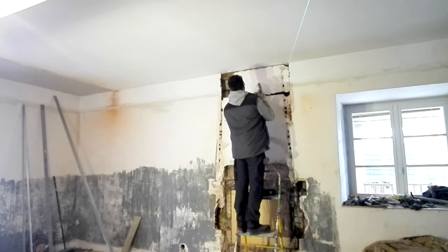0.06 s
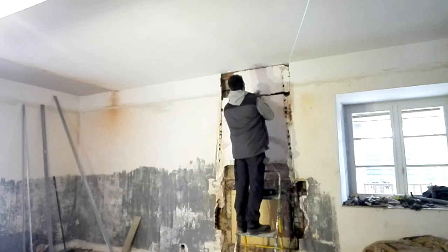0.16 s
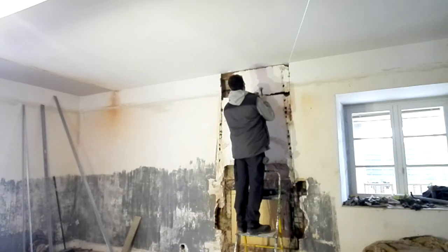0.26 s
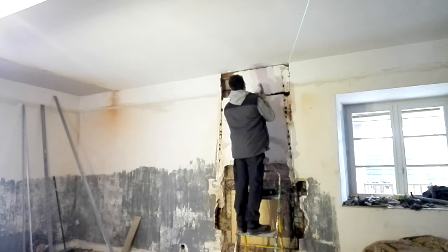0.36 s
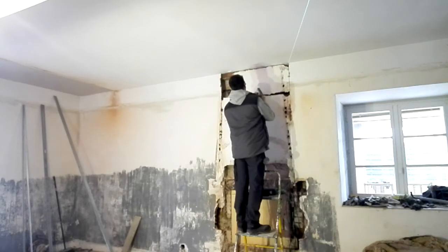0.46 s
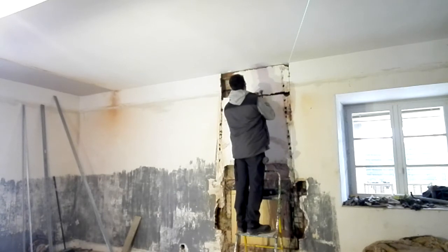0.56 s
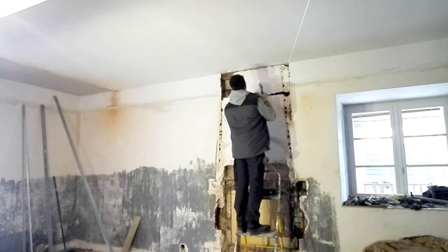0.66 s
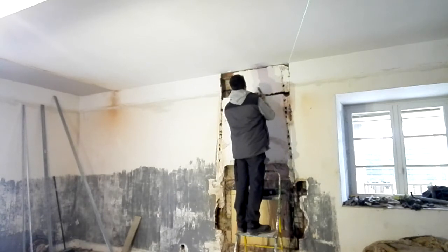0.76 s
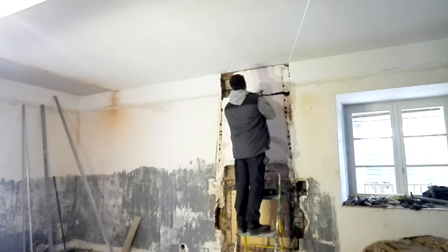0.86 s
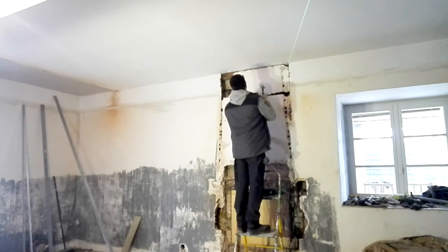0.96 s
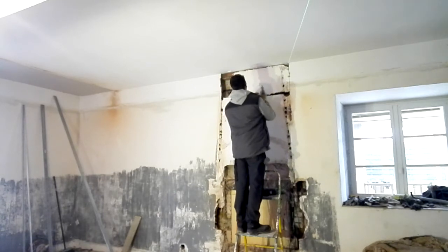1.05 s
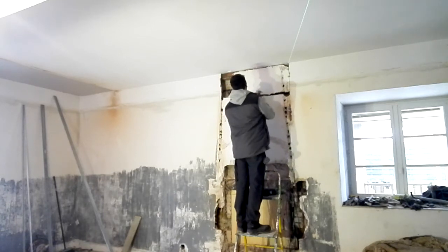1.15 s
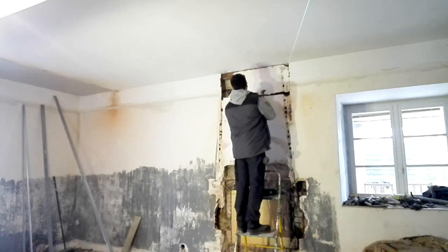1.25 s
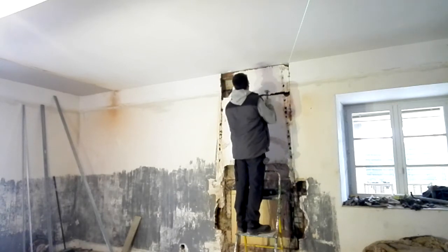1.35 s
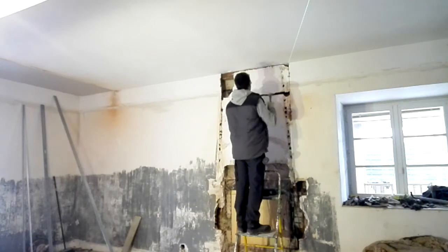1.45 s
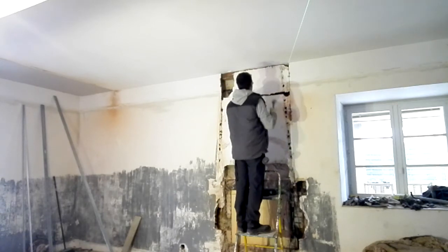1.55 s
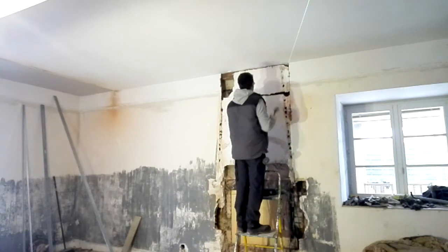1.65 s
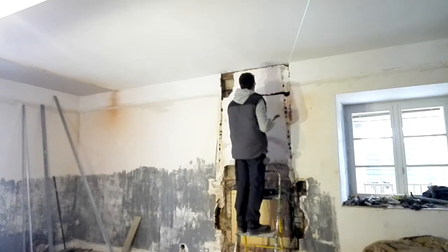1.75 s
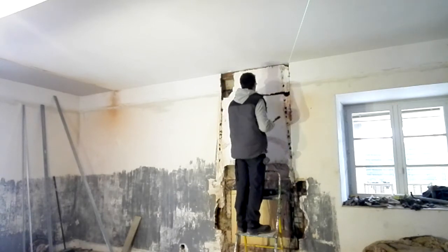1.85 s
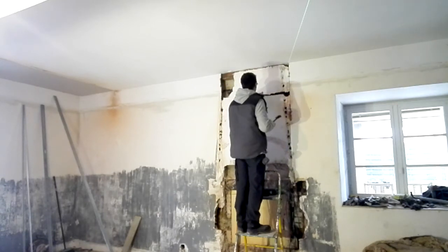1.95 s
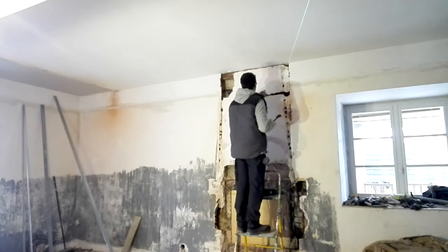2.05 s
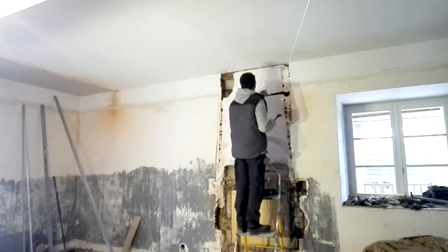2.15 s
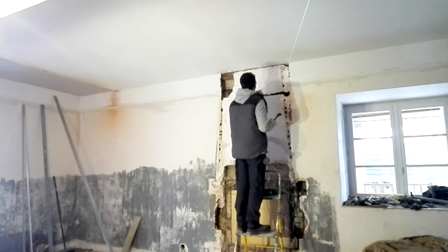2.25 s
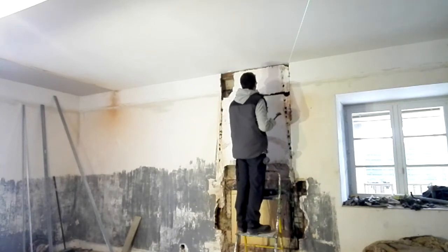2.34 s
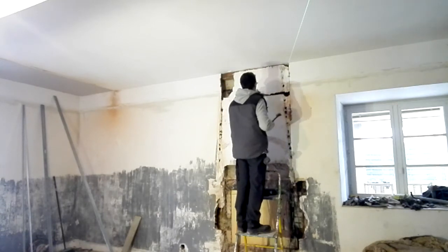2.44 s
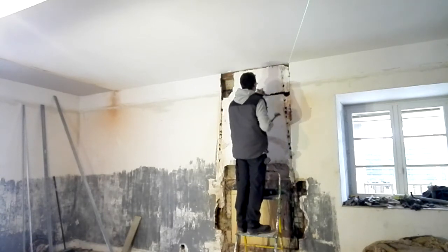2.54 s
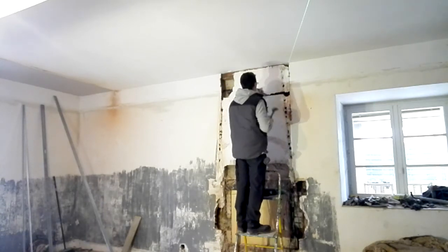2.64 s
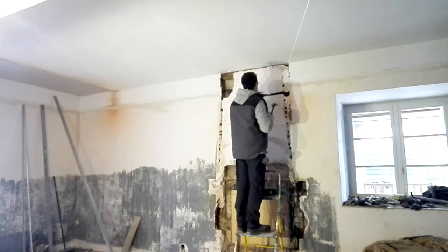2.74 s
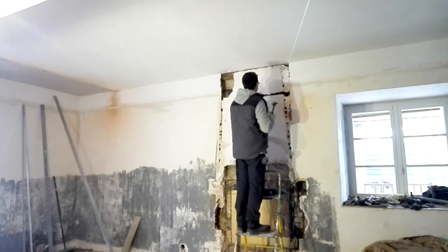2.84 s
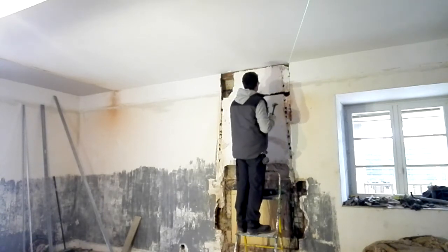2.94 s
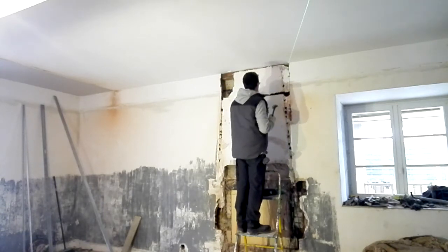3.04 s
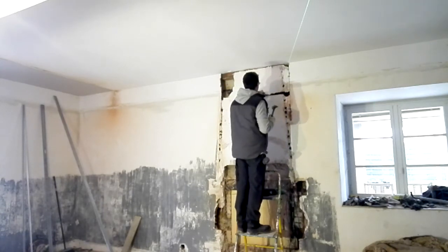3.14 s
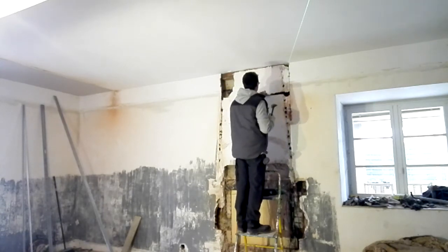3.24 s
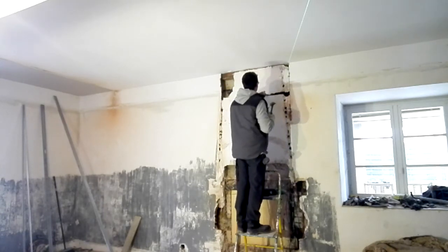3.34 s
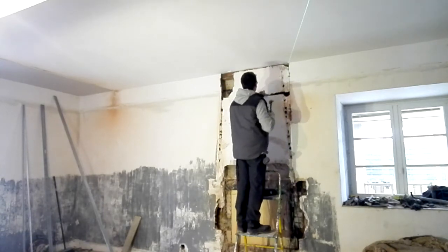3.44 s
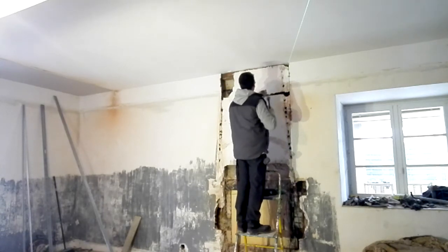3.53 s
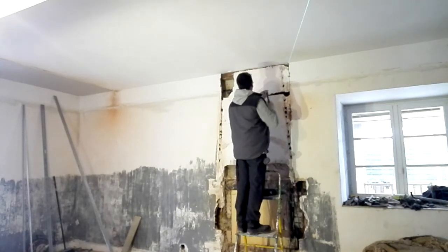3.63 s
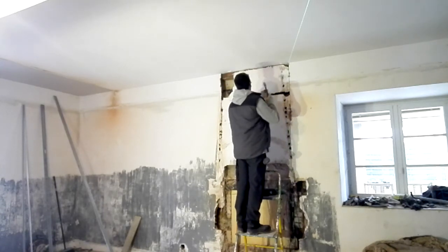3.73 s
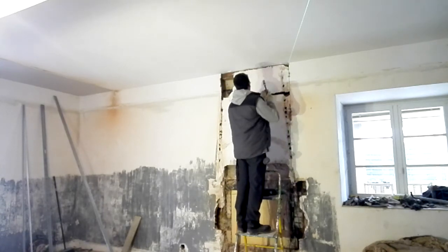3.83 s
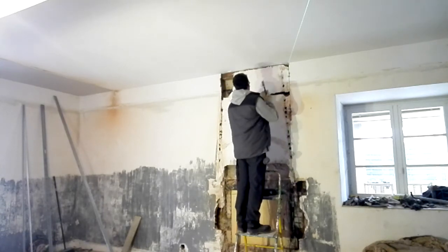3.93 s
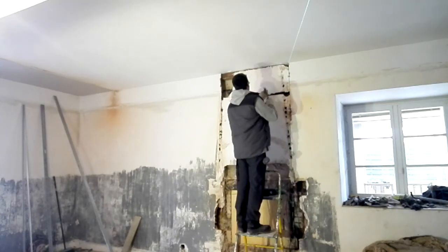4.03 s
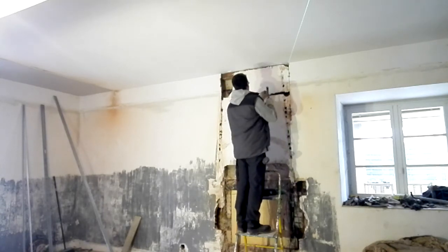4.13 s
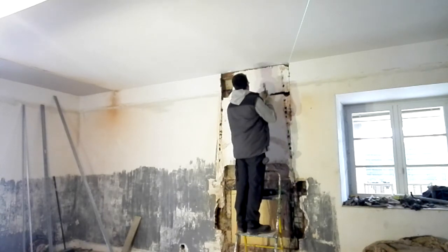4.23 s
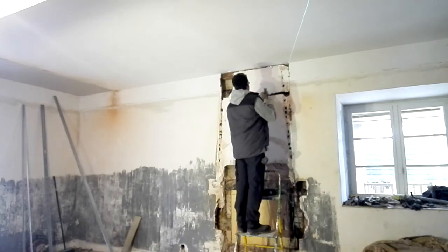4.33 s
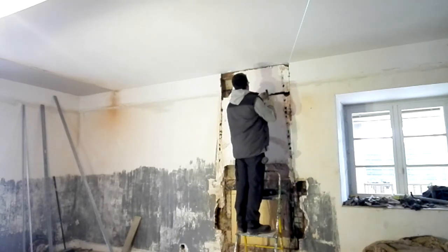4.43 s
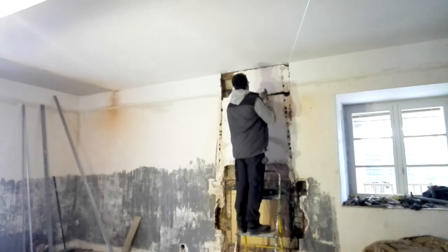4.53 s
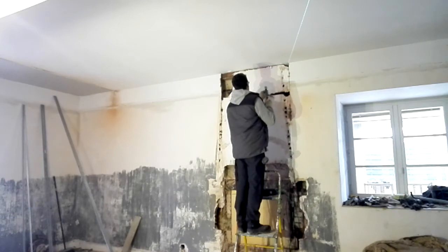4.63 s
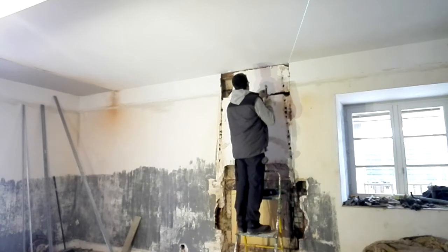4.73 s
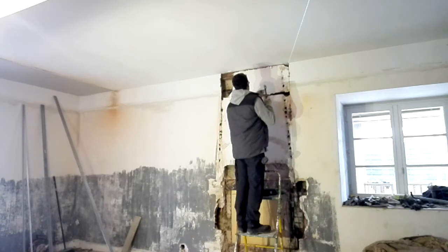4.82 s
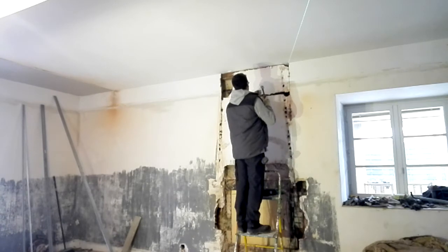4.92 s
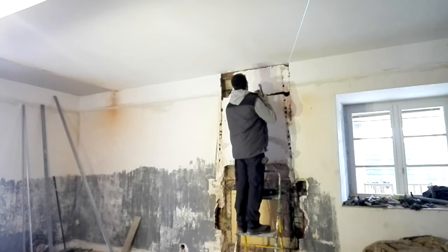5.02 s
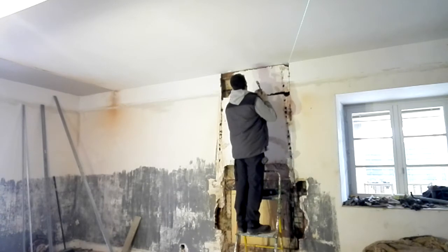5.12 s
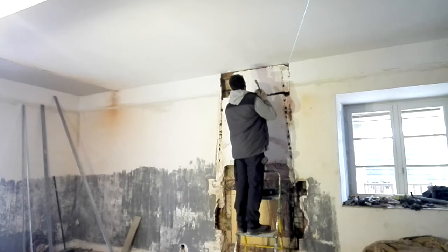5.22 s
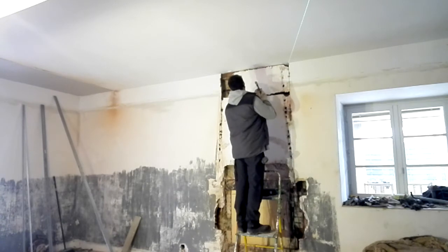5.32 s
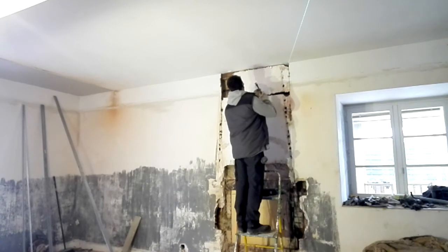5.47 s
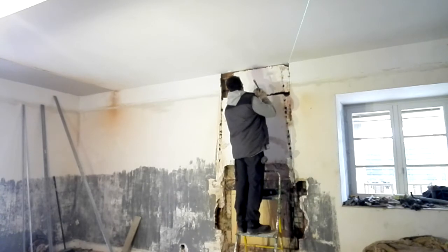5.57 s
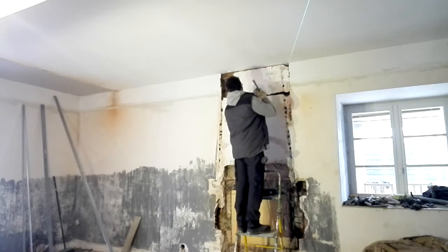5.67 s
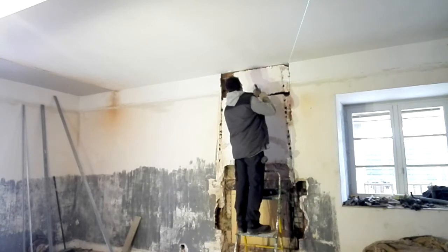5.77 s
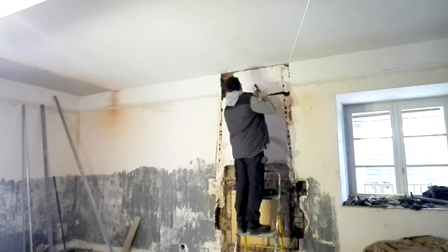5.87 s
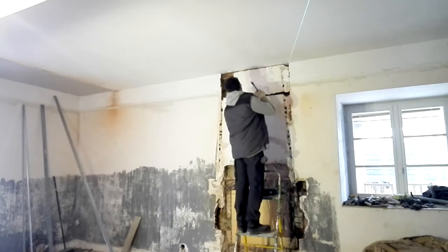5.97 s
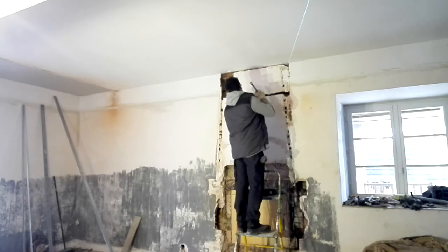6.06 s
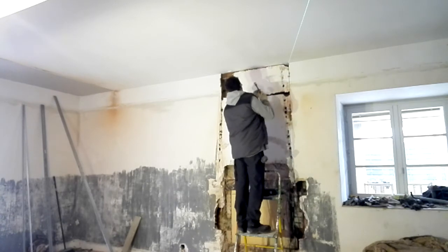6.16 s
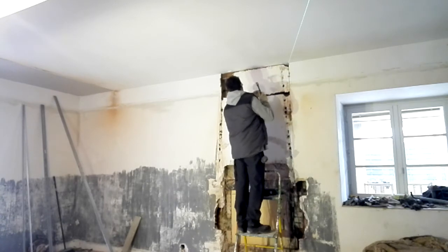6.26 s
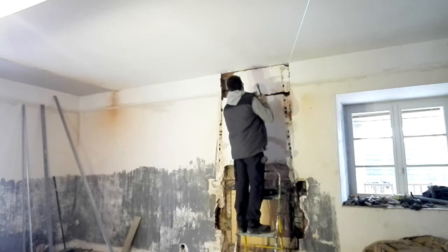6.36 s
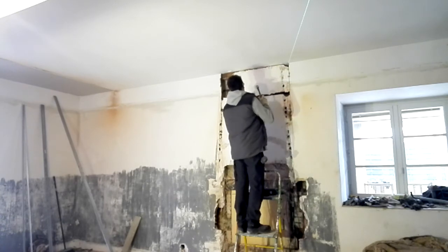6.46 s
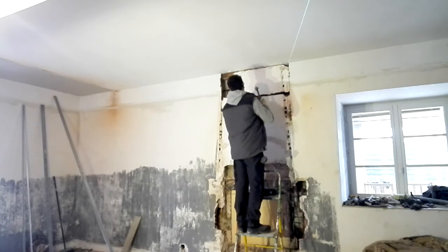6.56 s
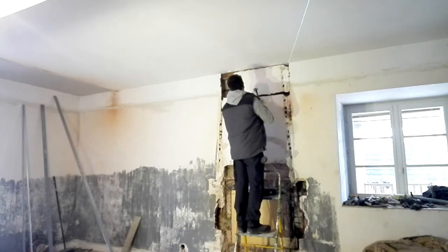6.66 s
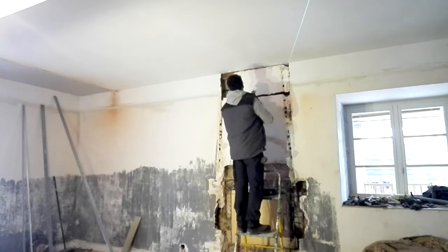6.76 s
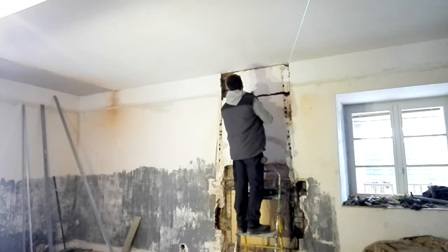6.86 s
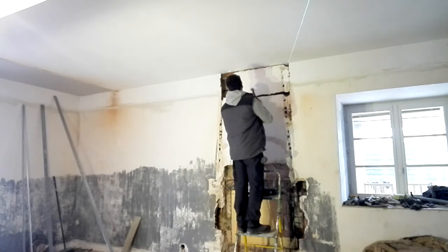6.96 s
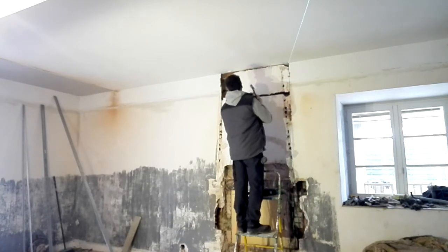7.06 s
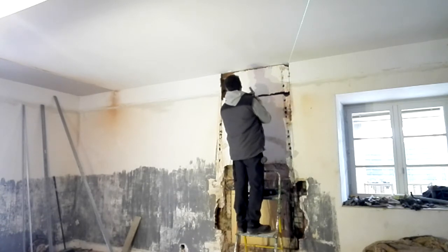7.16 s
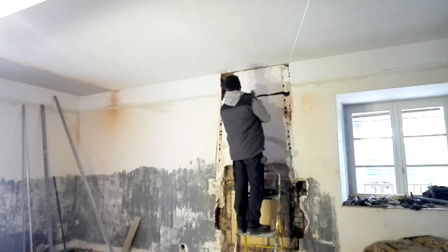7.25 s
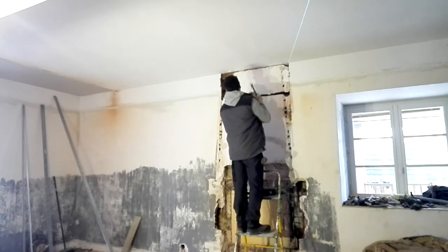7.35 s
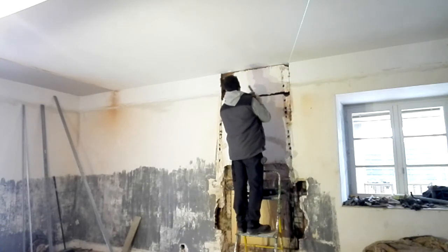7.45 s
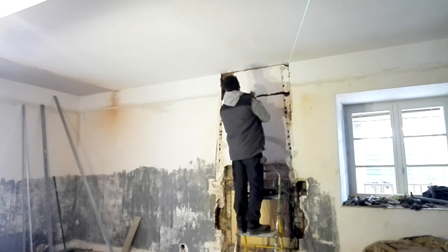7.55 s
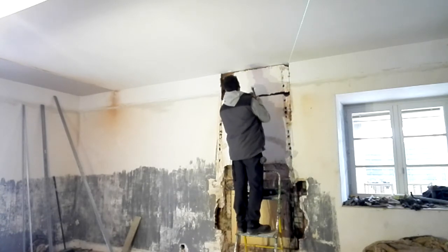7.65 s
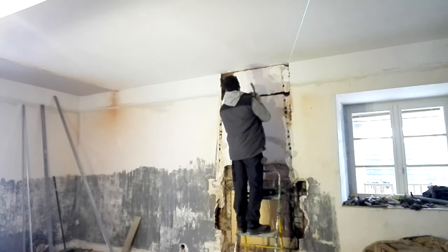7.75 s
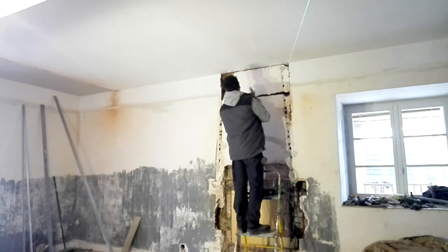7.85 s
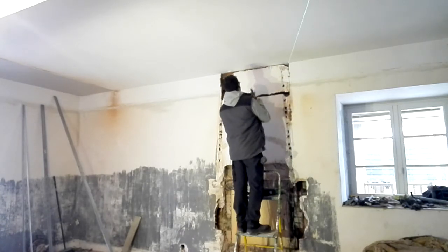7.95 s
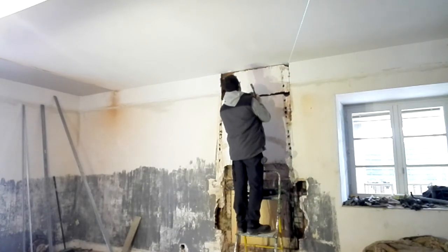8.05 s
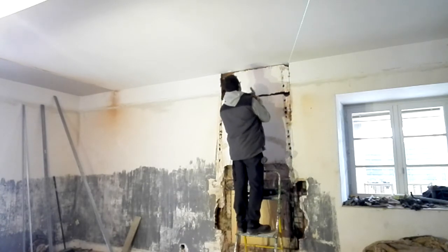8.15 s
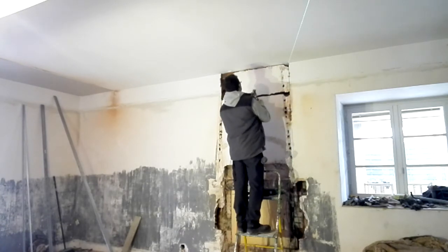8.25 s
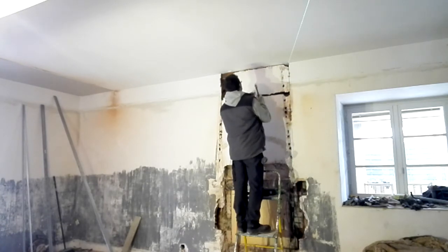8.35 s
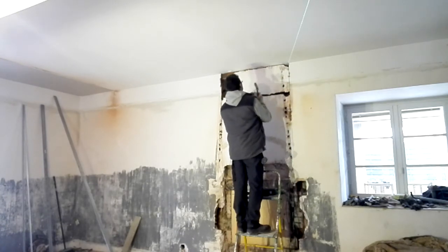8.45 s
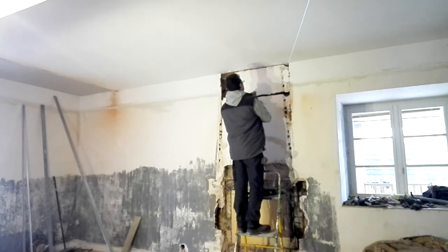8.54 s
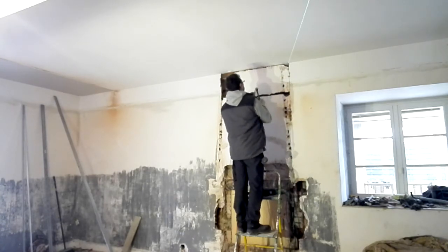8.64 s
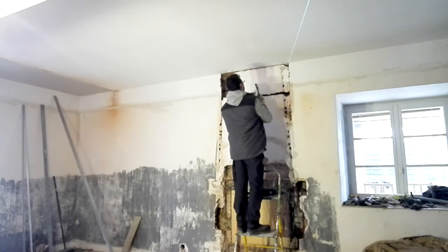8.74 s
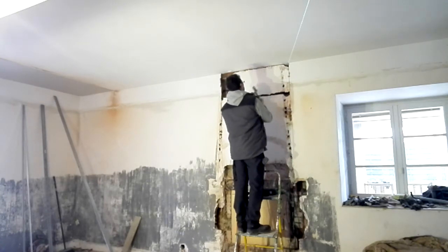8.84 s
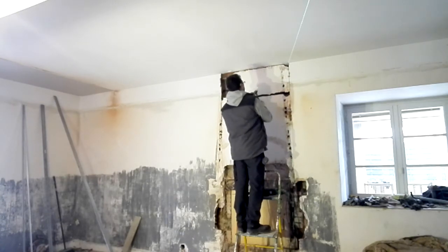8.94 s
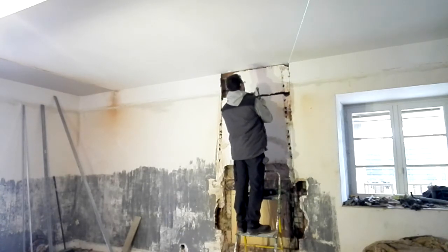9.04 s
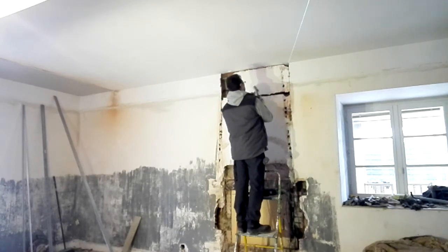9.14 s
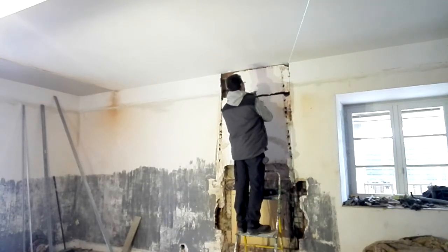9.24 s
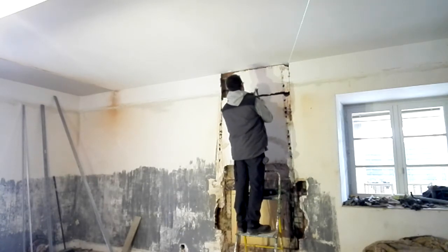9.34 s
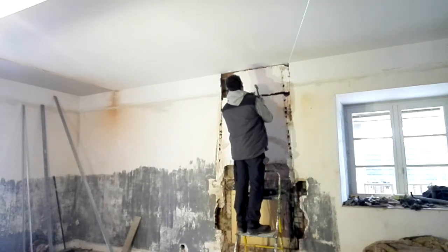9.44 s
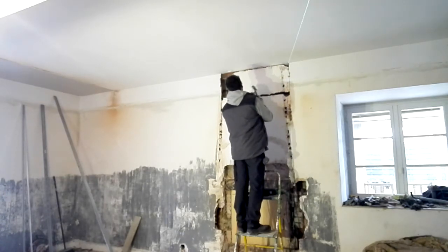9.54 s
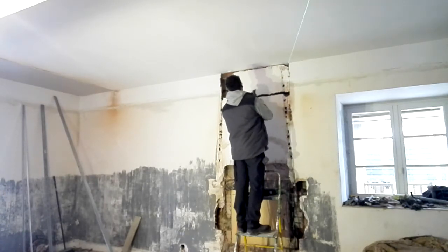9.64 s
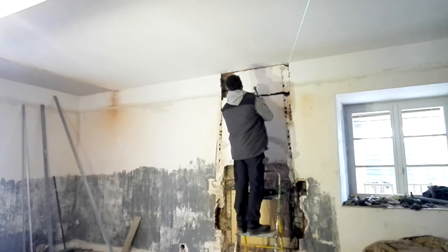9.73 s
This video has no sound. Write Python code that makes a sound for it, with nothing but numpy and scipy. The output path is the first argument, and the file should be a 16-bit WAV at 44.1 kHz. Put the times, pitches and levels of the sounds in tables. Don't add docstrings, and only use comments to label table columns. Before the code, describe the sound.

Runs of hard hammer-on-chisel cracks boom through an empty reverberant room, broken by lighter taps, falling plaster bits and gritty foot shuffles.

```python
import sys
import numpy as np
from scipy import signal
from scipy.fft import rfft, irfft, next_fast_len
from scipy.io import wavfile
from scipy.ndimage import uniform_filter1d

SR = 44100
rng = np.random.default_rng(int(sys.argv[2]) if len(sys.argv) > 2 else 0)


def wrap_up_sound(samples):
    columns = np.atleast_2d(samples).T
    tamed = np.clip(columns, -1, 1)
    steps = np.round(tamed * 32767).astype(np.int16)
    wavfile.write(sys.argv[1], SR, steps)


def gain_from_decibels(decibels):
    exponent = np.asarray(decibels, float) / 20
    return 10 ** exponent


N = 431738
LEAD = 8820

# (time [s], plaster crack level [dB],
# then against the crack: chisel ring [dB], hammer face ring [dB], hammer cheek ring [dB])
BLOWS = [(0.19, -12, -11.5, -4.5, -18.5), (0.509, -12, -9.5, -6.5, -16.5), (0.83, -12.5, -18, -9, -19.5),
         (1.153, -13.5, -13.5, -5, -12.5), (4.052, -15, -1, -13, -11.5), (4.355, -19.5, 8, 3, 7),
         (5.791, -19, 0, -13, -11.5), (7.239, -20.5, 1.5, -6, -2.5), (7.551, -13.5, -3.5, -19, -7.5),
         (7.882, -11, -9.5, -2.5, -7), (8.213, -13, -11, 0.5, -9), (8.561, -13, -9.5, -8, -8.5),
         (8.908, -14, -14, -17.5, -10.5), (9.24, -14, -3, -10.5, -4.5), (9.616, -14, -4, -4, 3)]
# (time [s], freedom [0-1], wall thud [dB], cladding knock [dB],
# then against the chisel ring: bending [dB], tip ring [dB])
CHISEL_SEAT = [
    (.2, 0.01, -6.5, -4.5, 13, -3),
    (1.2, 0.06, -4, -3.5, -2, -20.5),
    (4.099, .39, -14.5, -20.5, 0.5, -12),
    (4.4, .39, -20, -16.5, 3, 2.5),
    (5.8, 0.23, -9, -9.5, -2.5, -15.5),
    (7.2, 0.29, -0.5, -7.5, -8, -2.5),
    (8.6, 0.08, -6, -9.5, 2.5, 0.5),
    (9.6, 0.28, -11, -9, -3, -3.5),
]
# (frequency [Hz], level [dB], free t60 [s])
CHISEL_LENGTH_MODES = [(5920, 0, .5), (5968, -7, .4), (6015, -10, .3)]
# (frequency [Hz], level [dB], free t60 [s])
CHISEL_TIP_MODES = [(11512, 0, .4), (11448, -13, .3), (11640, -9, .25)]
# (frequency [Hz], level [dB], free t60 [s])
CHISEL_BEND_MODES = [(2186, 0, .5), (2126, -8, .3), (2223, -7, .3), (4070, -4, .18), (4143, -2, .22),
                     (4650, -15, .2)]
# (frequency [Hz], level [dB], free t60 [s])
CHISEL_UPPER_MODES = [(9990, 0, .3), (10250, -4, .15), (10600, -7, .12), (9240, -9, .2), (13140, -1, .3)]
# (frequency [Hz], level [dB], free t60 [s])
HAMMER_FACE_MODES = [(7230, 2, 0.38), (7320, 2.5, 0.12), (4760, -19.5, .15)]
# (frequency [Hz], level [dB], free t60 [s])
HAMMER_CHEEK_MODES = [(6680, 3, .25), (6730, -2, 0.22), (11800, -14, .25), (4740, -9.5, 0.39),
                      (8100, -9.5, .2)]
# (frequency [Hz], level [dB])
CRACK_COLOUR = [(60, -25), (400, -17.5), (900, -5), (1400, 0), (2000, -1.5), (3000, -3), (5000, -4.5),
                (7500, -5.5), (8100, -13), (11600, -18), (12300, -30.5), (14000, -31.5)]
# (frequency [Hz], level [dB], t60 [s])
BOOM_MODES = [(29, -17, 0.83), (35.4, -12, 0.49), (49, -14.5, 1.8), (87, -8.5, 0.98), (111.9, -8, 0.85),
              (139.7, -7, 0.84), (166.3, -1, 0.52), (183.4, 2.5, 0.3), (220, -1.5, .4), (245.3, -12, 0.55),
              (270, -4, 0.35), (321.6, -11.5, 0.21), (309, 11, 0.05)]
# (time [s], level [dB], centre [Hz], spread [octaves])
DEBRIS_PIECES = [(1.622, -48.5, 6300, .58), (1.753, -56, 3000, 2), (1.874, -49.5, 4730, .67),
                 (2.31, -64.5, 5010, 0.7), (2.567, -54.5, 2350, 1.2), (2.887, -69, 3000, 1.5),
                 (3.151, -24, 2060, 0.83), (3.157, -45, 437, 0.15), (3.993, -55.5, 5000, 1.5),
                 (4.877, -55, 2560, 1.3), (4.929, -55.5, 5250, 0.1), (4.935, -58, 9000, .6),
                 (5.131, -53, 3870, 0.31), (5.277, -39.5, 4790, 0.46), (5.282, -54, 12020, 0.24),
                 (5.669, -65.5, 4900, 1), (6.29, -40, 3170, 0.75), (6.1, -61, 9100, 0.39),
                 (6.297, -41, 1390, 0.57), (6.442, -22, 2400, 0.89), (6.45, -52.5, 337, 0.55),
                 (6.658, -50, 5000, 0.78), (7.06, -68.5, 4520, 1)]
# (time [s], level [dB], centre [Hz], length [s])
STEP_THUMPS = [(1.853, -53, 218.6, 0.016), (1.901, -34, 153, 0.0054), (2.425, -58, 40.4, 0.038),
               (2.488, -54, 170, 0.071), (2.573, -53, 226, .022), (3.062, -35.5, 70, 0.058),
               (3.395, -39, 117, 0.016), (3.664, -42, 71, 0.013), (3.867, -47.5, 124, 0.038),
               (4.87, -44, 80, 0.026), (5.161, -40, 121, 0.015), (6.586, -53, 177, 0.016),
               (6.781, -53, 49.2, 0.045)]
# (time [s], level [dB], frequency [Hz], t60 [s])
STEEL_CLINKS = [(1.885, -63, 4180, .08), (1.885, -62, 4600, 0.096), (2.1, -78, 4620, 0.12),
                (1.95, -71, 9260, 0.27), (2.0, -65, 6690, .06), (2.041, -70, 4600, 0.17),
                (2.05, -67.5, 10000, .1), (3.017, -61.5, 4100, .12), (3.078, -59, 3350, 0.032),
                (3.126, -51, 4150, .035), (3.656, -62.5, 4170, 0.049), (6.293, -44.5, 3160, 0.0055)]
# (time [s], level [dB], length [s], brightness [dB])
SOLE_SLIDES = [(1.861, -49, 0.1, -6.5), (2.012, -57.5, 0.0775, 9), (2.405, -59, 0.133, -16),
               (2.58, -57, 0.083, -29), (3.009, -49.5, 0.11, -21), (3.041, -46.5, 0.25, 5),
               (3.407, -53.5, 0.036, -20), (3.634, -59, .082, 8), (3.815, -61, 0.14, 1),
               (4.864, -52.5, .074, -8), (5.108, -51.5, 0.24, -7)]
# (frequency [Hz], level [dB])
SOLE_COLOUR = [(100, -9), (450, -11.5), (580, 0.5), (650, -13), (730, -1.5), (950, -6.5), (1250, -0.5),
               (1450, -4), (1700, -5), (2300, -9.5), (5000, -13.5), (14000, -38)]
# (frequency [Hz], level [dB], t60 [s])
HELD_CHISEL_MODES = [(4140, -2, .15), (4600, 0, .3), (6650, -5, .2), (8060, -8, .1), (9300, -6, .2),
                     (10000, -6, .15)]
# (delay [s], level [dB])
FIRST_ECHOES = [(.0045, 2), (.0075, -10), (.015, -8), (0.025, -1)]
# (frequency [Hz], t60 [s])
ROOM_DECAY = [(40, 0.73), (110, 0.45), (280, 0.65), (740, 0.65), (1940, 0.68), (5120, 0.58), (13500, 0.31)]
# (frequency [Hz], level [dB])
HUSH_COLOUR = [(30, -5.5), (150, -7), (500, -23), (3000, -27), (14000, -40.5)]


def shaped(x, points):
    hz, db = np.transpose(points)
    size = next_fast_len(len(x))
    f = np.fft.rfftfreq(size, 1 / SR) + 1
    gain = gain_from_decibels(np.interp(np.log(f), np.log(hz), db))
    return irfft(rfft(x, size) * gain, size)[:len(x)]


def hump(x, centre_hz, octaves):
    f = np.fft.rfftfreq(len(x), 1 / SR) + 1
    gain = np.exp(-0.5 * (np.log2(f / centre_hz) / octaves) ** 2)
    return irfft(rfft(x) * gain, len(x))


def unit(x):
    return x / np.sqrt(np.sum(x ** 2))


def add(out, time_s, x):
    i = LEAD + int(time_s * SR)
    fade = np.minimum(np.linspace(3, 0, len(x)), 1)
    out[i:i + len(x)] += (x * fade)[:len(out) - i]


def ring(modes, damping, scatter_db, detune, rise_s, turns=1, size=SR // 2):
    t = np.arange(size) / SR
    out = np.zeros(size)
    for hz, db, t60_s in modes:
        pitch, level, phase = rng.standard_normal(3)
        swing = np.sin(2 * np.pi * (hz * (1 + detune * pitch) * t + turns * phase))
        decay = np.exp(-np.log(1000) * t / (t60_s * damping))
        out += gain_from_decibels(db + scatter_db * level) * swing * decay
    return unit(out * (1 - np.exp(-t / rise_s)))


def burst(length_s, grit_db):
    t = np.arange(SR // 2) / SR
    grains = gain_from_decibels(grit_db * np.repeat(rng.standard_normal(SR // 80 + 1), 40)[:len(t)])
    envelope = np.exp(-t / length_s) * (1 - np.exp(-t / (0.25 * length_s)))
    spectrum = rfft(rng.standard_normal(len(t)) * grains * envelope)
    return irfft(spectrum / np.sqrt(uniform_filter1d(np.abs(spectrum) ** 2, size=12)), len(t))


def steel_rings(db, chisel_db, face_db, cheek_db, freedom, bend_db, tip_db):
    contact = np.exp(-np.arange(SR // 2) / SR / 0.002)
    freedom = np.clip(freedom, 0.1, 1)
    # (modes, level [dB], wall damping exponent)
    parts = [(CHISEL_LENGTH_MODES, chisel_db + 27, 1.5),
             (CHISEL_TIP_MODES, chisel_db + tip_db + 26, 1.1),
             (CHISEL_BEND_MODES[:3], chisel_db + bend_db + 15, 1.1),
             (CHISEL_BEND_MODES[3:], chisel_db + 16, 1.25),
             (HAMMER_CHEEK_MODES, cheek_db + 24, 1.3),
             (HAMMER_FACE_MODES, face_db + 22.5, 1.4),
             (CHISEL_UPPER_MODES, cheek_db + 16.5, 1.2)]
    held = 1 + 2.2 * (1 - freedom) * contact
    return [gain_from_decibels(db + part_db) * held
            * ring(modes, freedom ** grip, scatter_db=2, detune=0.001, rise_s=0.0002)
            for modes, part_db, grip in parts]


def plaster_blow(db, knock_db, cheek_db):
    crack = gain_from_decibels(db + 28.5) * unit(shaped(burst(0.0018, 3.2), CRACK_COLOUR))
    cladding = gain_from_decibels(db + knock_db + 30.5) * unit(hump(burst(0.01, 1.0), 827, 0.76))
    trickle = gain_from_decibels(db + 0.4 * cheek_db) * unit(hump(burst(0.19, 4.5), 9000, 0.7))
    return crack + cladding + trickle


def add_booms(boom, time_s, db, thud_db):
    add(boom, time_s, gain_from_decibels(db + 14) * unit(hump(burst(0.0039, 3.8), 9100, 0.4)))
    deep = ring(BOOM_MODES[:5], 0.55, 1.5, 0.006, rise_s=0.014, turns=0.045, size=SR)
    add(boom, time_s + 0.0016, gain_from_decibels(db + 0.34 * thud_db + 21.5) * deep)
    wall = ring(BOOM_MODES[5:], 0.68, 1.1, 0.0027, rise_s=0.013, turns=0.045, size=SR)
    add(boom, time_s + 0.0012, gain_from_decibels(db + thud_db + 31.5) * wall)


def hammer():
    air, boom = np.zeros((3, N + LEAD)), np.zeros(N + LEAD)
    push = unit(hump(burst(0.0056, 1.8), 260, 0.46))
    seat_s, *seat = np.transpose(CHISEL_SEAT)
    earlier = (-0.13, *BLOWS[0][1:])
    for k, (s, db, chisel_db, face_db, cheek_db) in enumerate([earlier] + BLOWS):
        freedom, thud_db, knock_db, bend_db, tip_db = (np.interp(s, seat_s, column) for column in seat)
        rings = steel_rings(db, chisel_db, face_db, cheek_db, freedom, bend_db, tip_db)
        for j, steel in enumerate(rings):
            add(air[(k + 1 + j % 2) % 3], s, steel)
        add(air[0], s, gain_from_decibels(db + thud_db + 27) * push)
        add(air[k % 3], s, plaster_blow(db, knock_db, cheek_db))
        add_booms(boom, s, db, thud_db)
    return air, boom


def add_knock(out, time_s, db, hz, octaves, length_s):
    add(out, time_s, gain_from_decibels(db + 32) * unit(hump(burst(length_s, 3.7), hz, octaves)))


def debris():
    out = np.zeros(N + LEAD)
    for s, db, hz, octaves in DEBRIS_PIECES:
        length_s = 0.0022 + 0.0098 / (1 + gain_from_decibels(db + 47.5))
        add_knock(out, s, db, hz, octaves, length_s)
    return out


def step_thumps():
    out = np.zeros(N + LEAD)
    rocks = [(6.812 + k * 0.035, -57 - 7.5 * k, 140 * 0.7 ** k, 0.018) for k in range(5)]
    for s, db, hz, length_s in STEP_THUMPS + rocks:
        add_knock(out, s, db, hz, 0.91, length_s)
    return out


def clinks():
    out = np.zeros(N + LEAD)
    for s, db, hz, t60_s in STEEL_CLINKS:
        add(out, s, gain_from_decibels(db + 41.5) * ring([(hz, 0, t60_s)], 1, 0, 0, rise_s=0.00058))
    return out


def slides():
    out = np.zeros(N + LEAD)
    t = np.arange(SR // 2) / SR
    for s, db, length_s, bright_db in SOLE_SLIDES:
        stutter = gain_from_decibels(6.5 * np.repeat(rng.standard_normal(SR // 400 + 1), 200)[:len(t)])
        stroke = np.sin(np.pi * np.minimum(t / length_s, 1)) ** 0.33
        rub = rng.standard_normal(len(t)) * stutter * stroke
        sole = unit(shaped(rub, SOLE_COLOUR)) + gain_from_decibels(bright_db - 8) * unit(hump(rub, 5000, 0.9))
        chisel = ring(HELD_CHISEL_MODES, 0.88, 3, 0.004, rise_s=0.00098)
        steel = unit(signal.fftconvolve(rub, chisel)[:len(t)])
        add(out, s, gain_from_decibels(db + 36) * (sole + gain_from_decibels(-7 - 97.5 * length_s) * steel))
    return out


def room():
    stft = dict(fs=SR, nperseg=256, noverlap=192)
    f, t, noise = signal.stft(rng.standard_normal(3 * SR // 2), **stft)
    hz, t60_s = np.transpose(ROOM_DECAY)
    f = f[:, None] + 60
    decay = np.exp(-np.log(1000) * t / np.interp(np.log(f), np.log(hz), t60_s))
    fade = decay * (1 - np.exp(-t / (0.00023 + 2.3 / f)))
    fade /= np.sqrt(np.sum(fade ** 2, axis=1, keepdims=True))
    cloud = signal.istft(noise * fade, **stft)[1]
    return unit(cloud * (1 - np.exp(-np.arange(len(cloud)) / SR / 0.002)))


def hush():
    return gain_from_decibels(-71.5) * np.sqrt(N) * unit(shaped(rng.standard_normal(N), HUSH_COLOUR))


def scene():
    air, boom = hammer()
    air[0] += debris() + step_thumps() + clinks()
    air[1] += slides()
    wet = sum(signal.fftconvolve(spot, room())[:len(spot)] for spot in air)
    direct = air.sum(axis=0)
    echoes = sum(gain_from_decibels(db) * np.roll(direct, int(s * SR)) for s, db in FIRST_ECHOES)
    mid = (gain_from_decibels(-11) * (direct + echoes) + wet + boom)[LEAD:] + hush()
    return np.array([mid, mid])


def denoised(x, floor_db, most_db):
    _, _, bins = signal.stft(x, SR, nperseg=512)
    power = uniform_filter1d(np.abs(bins) ** 2, size=5, axis=0)
    power = uniform_filter1d(power, size=5, axis=1)
    gain = np.maximum(power ** 2 / (power ** 2 + gain_from_decibels(4 * floor_db)), gain_from_decibels(most_db))
    return signal.istft(bins * gain, SR, nperseg=512)[1][:N]


def parting(mid):
    f, t, bins = signal.stft(mid, SR, nperseg=1024)
    edges_hz = [4200, 5600, 6200, 7400, 8300, 9600, 10600, 11300, 12400, 13600]
    odds = np.array([0, 0.3, 0.15, 0.3, 0.4, 0.5, 0.45, 0.25, 0.2, 0.15, 0])
    band = np.searchsorted(edges_hz, f)
    on = rng.random((11, len(t) // 3 + 1)) < odds[:, None]
    on = np.repeat(on, 3, axis=1)[band, :len(t)]
    phase = np.exp(2j * np.pi * rng.random(bins.shape))
    return signal.istft(bins * on * phase, SR, nperseg=1024)[1][:N]


def band_limit(x):
    return signal.sosfilt(signal.butter(12, 15310, fs=SR, output="sos"), x)


def record(dry):
    x = signal.sosfilt(signal.butter(2, 24, "high", fs=SR, output="sos"), dry[0])
    x = denoised(np.tanh(0.57 * x) / 0.62, floor_db=-82.5, most_db=-8)
    x = x + gain_from_decibels(-82) * hump(rng.standard_normal(N), 3000, 1.6)
    x = shaped(x, [(14230, 0), (14290, -22)])
    pair = x + gain_from_decibels(-8.5) * parting(x) * np.array([[1], [-1]])
    return band_limit(np.clip(pair, -1, 1))


dry = scene()
out = record(dry)
wrap_up_sound(out)
```